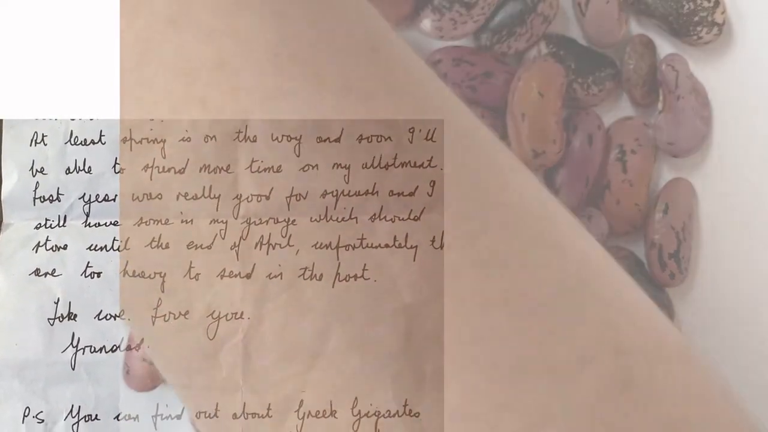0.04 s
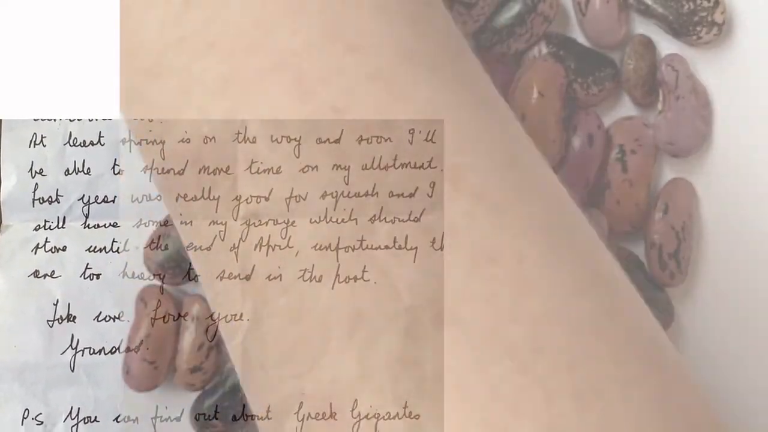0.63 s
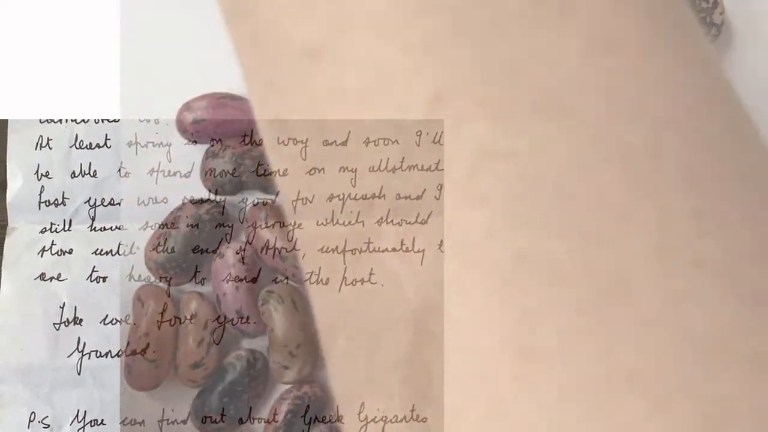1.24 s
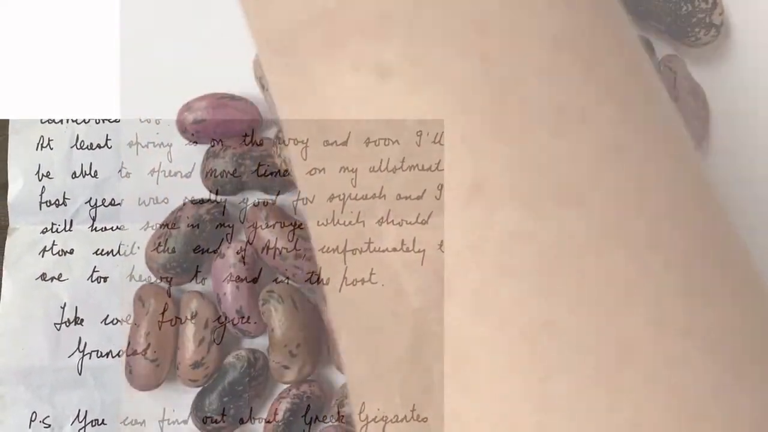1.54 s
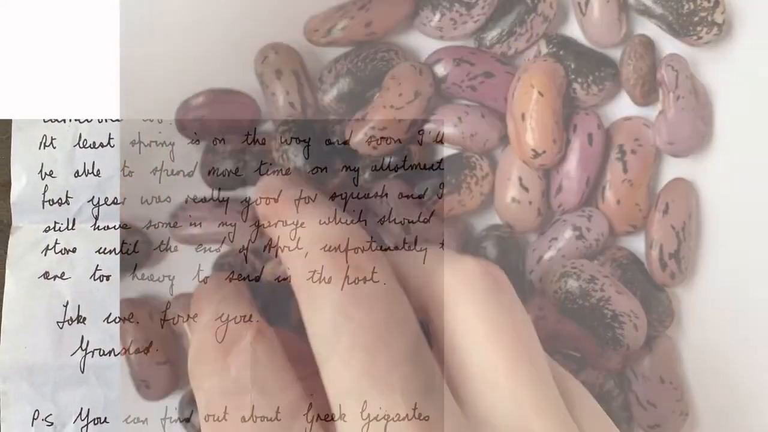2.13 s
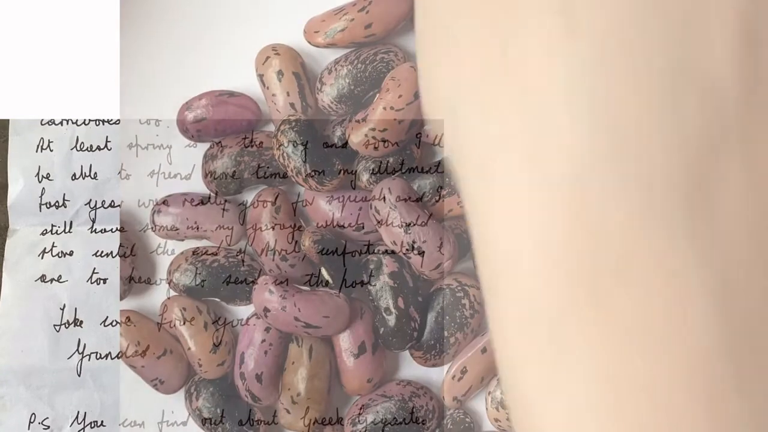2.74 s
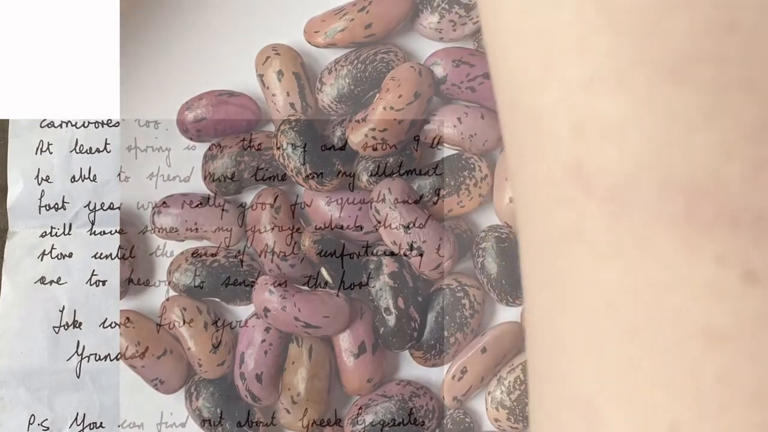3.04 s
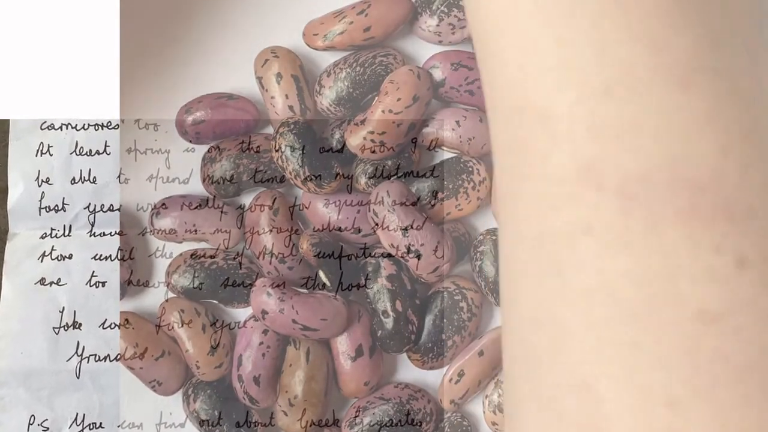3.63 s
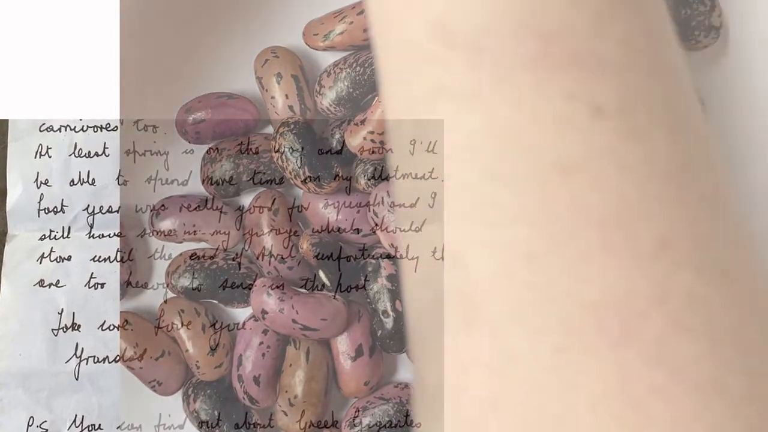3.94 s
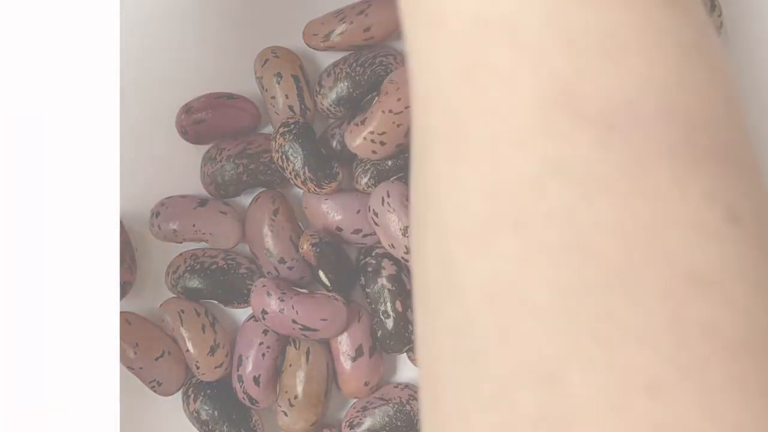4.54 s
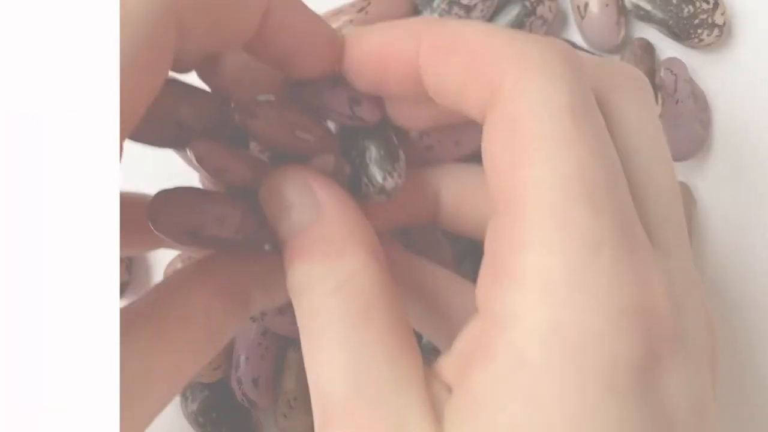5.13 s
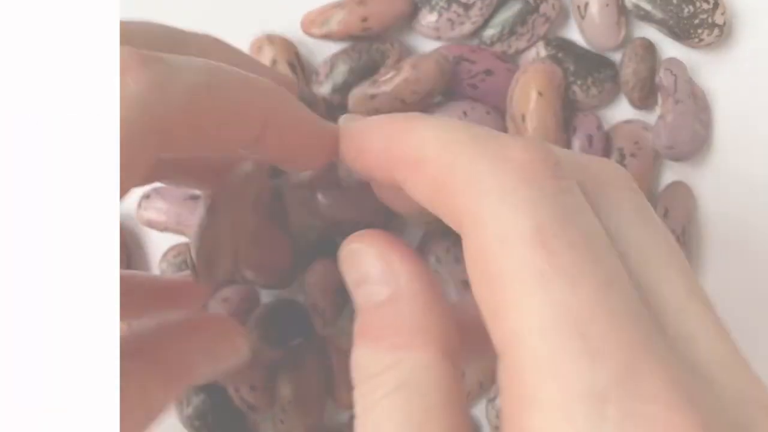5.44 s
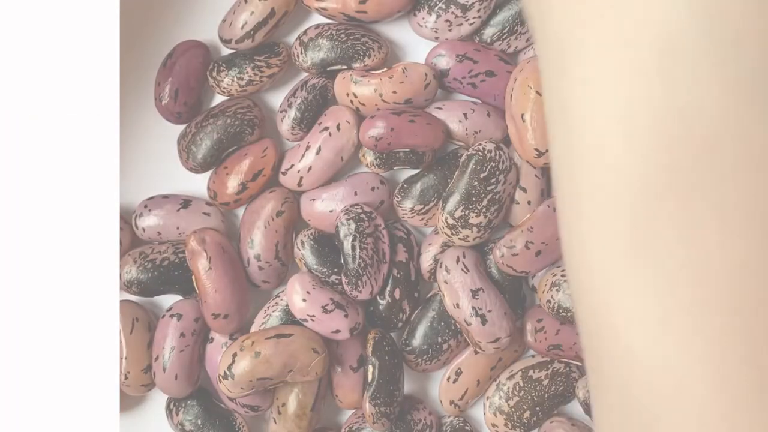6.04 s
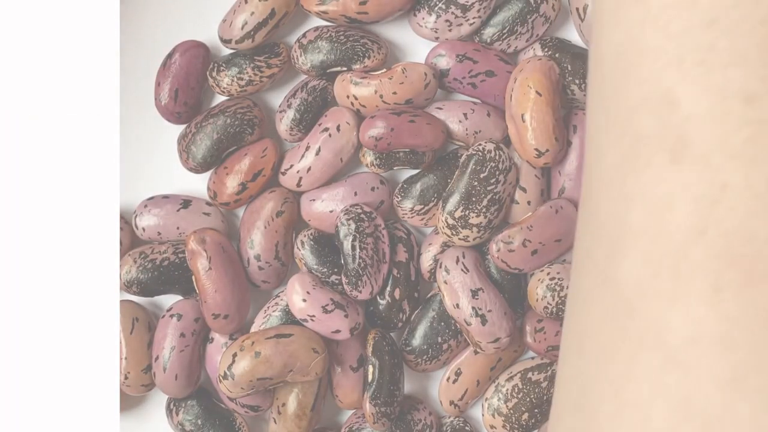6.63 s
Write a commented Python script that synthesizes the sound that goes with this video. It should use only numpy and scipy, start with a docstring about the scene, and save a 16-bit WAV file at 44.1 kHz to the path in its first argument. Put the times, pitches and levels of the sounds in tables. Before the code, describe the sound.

Large dried beans are stirred by hand on a paper-covered table, heard from close by in a small quiet room. From the start they scrape softly and click against one another. At about 0.9 seconds a few drop onto the table with hollow taps, and around 2 seconds a larger spill drums on the top and makes the paper crackle. From about 2.5 to 4.7 seconds the hands push through the pile in several firmer strokes, with dry rattling and sharp little clicks. After a brief lull, the loudest handful clatters down between 5.2 and 5.6 seconds. From about 6 seconds, lighter scraping and clicking continue until the end, near 7 seconds. A faint room hush and the low rumble of arms moving on the table lie underneath throughout.

```python
"""A small quiet room, one microphone close to a paper-covered table where hands stir large dried beans.
Pushed beans scrape and click against one another, ringing the hollow pile and the sheet under it.
Three times a handful tumbles down, drumming on the table top and making the paper crackle.
Underneath lie the hush of the room and the low rumble of arms moving on the table."""
import sys
import numpy as np
from scipy import signal
from scipy.fft import rfft, irfft
from scipy.io import wavfile

SR = 44100
rng = np.random.default_rng(int(sys.argv[2]) if len(sys.argv) > 2 else 0)


def file_out(sig):
    """Save sig as 16-bit WAV at sys.argv[1]."""
    # one column per channel
    cols = np.atleast_2d(sig).T
    # limit, then scale
    lim = np.clip(cols, -1, 1)
    pcm = np.round(lim * 32767).astype(np.int16)
    wavfile.write(sys.argv[1], SR, pcm)


N = 298998
TIME = np.arange(N) / SR

# spectrum of the room tone: frequency_hz, level_db
HUSH_SPECTRUM = [(60, -25), (130, -10), (220, -3), (300, 0), (370, -6), (470, -6), (600, -16), (850, -21),
                 (1500, -29), (3500, -27), (6000, -32), (10000, -36), (16000, -54)]
# spectrum of the rumble in the table: frequency_hz, level_db
RUMBLE_SPECTRUM = [(8, -6), (16, 8), (25, -1), (50, 0.5), (63, -2.5), (80, -15.5), (100, -10), (125, -8.5),
                   (165, -18), (200, -20), (320, -44)]
# fingers lingering in the pile: start_s, length_s, level_db
TOUCHES = [(0, 0.5, -66), (.55, 0.66, -72.5), (1.49, 0.038, -75.5), (2.8, 0.29, -73), (3.6, 0.23, -79.5),
           (4.55, 0.22, -76.5), (4.75, 0.077, -84), (6.06, 0.081, -64.5)]
# pushes through the pile: start_s, length_s, scrape_db, edge_db
PUSHES = [(0.14, 0.24, -59.5, -66), (0.615, 0.19, -62, -74), (1.05, 0.14, -70.5, -70),
          (1.19, 0.048, -59, -57.5), (1.39, 0.043, -66.5, -77), (2.414, 0.024, -55, -83),
          (2.505, 0.24, -49.5, -50), (2.7, 0.14, -63, -66), (3.115, 0.34, -50.5, -48.5),
          (3.735, 0.12, -52.5, -66), (3.86, 0.23, -50.5, -45), (4.13, 0.082, -51.5, -48),
          (4.25, 0.094, -52.5, -45.5), (4.37, 0.093, -60, -50), (4.465, 0.071, -54.5, -48),
          (4.64, 0.027, -60, -85), (6.15, .15, -53.5, -77), (6.31, 0.23, -62, -63.5),
          (6.48, 0.51, -62.5, -62.5), (6.67, 0.25, -60, -64)]
# spectrum of sliding beans: frequency_hz, level_db
SCRAPE_SPECTRUM = [(100, -14), (200, -6), (320, -4), (550, -6), (950, -4), (1400, -1), (2200, -3.5),
                   (3200, -6), (5000, -16), (9000, -26.5)]
# spectrum of the scrape's bright edge: frequency_hz, level_db
EDGE_SPECTRUM = [(1500, -51.5), (2800, -5), (4200, 1.5), (6000, -5), (8000, -10.5), (9200, -17.5),
                 (10300, -9), (12000, -13), (16000, -30.5)]
# resonances of the pile lying on the paper: pitch_hz, width_hz, gain_db
PILE_MODES = [(164, 93, 11.5), (320, 55, 6.5), (415, 110, -0.5), (799, 98, -1), (908, 67, -11),
              (1015, 39, 3), (1550, 180, -6.5), (2830, 71, -10.5)]
# one bean knocking another: start_s, level_db, pitch_hz, width_octaves
CLICKS = [(0.136, -48.5, 3320, .45), (0.151, -48, 3080, 1.1), (0.2056, -44.5, 1450, 0.96),
          (0.26, -45.5, 3500, 0.55), (0.3407, -43, 3660, 0.7), (0.3847, -49, 2130, 0.57),
          (0.458, -50.5, 1360, 0.98), (0.6169, -39.5, 1560, .86), (0.6581, -41.5, 1690, 0.45),
          (0.675, -45, 2270, .48), (0.6964, -35.5, 2260, 0.55), (0.7266, -29, 3700, 0.54),
          (0.7402, -41, 1900, 0.54), (0.754, -41, 1820, 0.32), (0.7788, -44, 1790, 0.5),
          (0.895, -40, 4200, 0.56), (0.9726, -47.5, 2720, 0.5), (1.0784, -43, 2830, 0.57),
          (1.2139, -39.5, 3780, 0.59), (1.229, -41.5, 1740, 0.69), (1.3182, -45, 1880, 0.15),
          (1.558, -43, 1850, .31), (1.932, -42.5, 4600, 0.84), (1.952, -43, 3020, 0.36),
          (1.991, -45, 4290, 0.78), (2.05, -44, 7140, 0.68), (2.4225, -43, 2920, 0.44),
          (2.545, -46, 3000, .65), (2.614, -36.5, 2130, 0.61), (2.6636, -38, 4700, 0.38),
          (2.6873, -38.5, 2820, 0.59), (2.721, -37, 3730, 0.36), (2.75, -37, 3200, 0.91),
          (2.7586, -33, 3200, 0.53), (2.8692, -50.5, 1480, 0.74), (3.131, -33.5, 3530, 0.37),
          (3.1794, -40.5, 4200, 0.37), (3.284, -45, 3270, 0.37), (3.3123, -29.5, 3680, 0.42),
          (3.3558, -38.5, 2250, 0.47), (3.385, -31.5, 4040, 0.45), (3.8187, -38.5, 1970, 0.76),
          (3.8927, -40.5, 3340, 1.1), (3.919, -43, 3620, 1.1), (3.996, -35.5, 3800, 0.43),
          (4.0194, -30, 2700, 0.83), (4.0385, -22.5, 4200, 0.44), (4.1132, -37, 2150, 0.55),
          (4.1669, -40.5, 4180, .46), (4.1895, -36, 4000, 0.37), (4.2001, -35, 3200, 0.4),
          (4.3064, -35.5, 2600, 0.43), (4.3176, -35.5, 2840, .42), (4.3686, -38, 3060, .35),
          (4.3873, -46, 2460, 0.31), (4.471, -34.5, 3730, 0.38), (4.487, -39.5, 3020, 0.27),
          (4.529, -42, 2960, 0.4), (4.6024, -49, 3270, 0.4), (4.6439, -44.5, 2440, 0.49),
          (5.028, -63, 7640, 1), (5.087, -59, 6730, 1.1), (5.128, -47, 9350, 0.84),
          (5.1713, -45.5, 6100, 0.51), (5.2281, -45.5, 4430, 0.84), (5.2714, -30, 5740, 0.59),
          (5.3007, -30, 5830, 0.45), (5.393, -29.5, 4560, 0.26), (5.4078, -32, 5270, 0.43),
          (5.4921, -52, 4650, .6), (5.5336, -37, 3980, 0.3), (5.5768, -37.5, 4080, 0.24),
          (6.0579, -38, 1013, 0.58), (6.114, -25, 5170, 0.26), (6.169, -40.5, 1800, 0.51),
          (6.195, -43, 2410, 0.63), (6.2195, -40.5, 1680, 0.57), (6.303, -41.5, 2770, 0.37),
          (6.363, -41.5, 5940, 0.63), (6.3723, -41.5, 1100, 0.43), (6.4201, -40.5, 2880, 0.46),
          (6.564, -45, 2530, 0.43), (6.6772, -44.5, 2020, 0.81), (6.747, -37.5, 2230, 0.46)]
# one bean landing on the table: start_s, level_db
LANDINGS = [(0.895, -22), (0.902, -29), (0.938, -26), (0.971, -29), (1.013, -34.5), (1.932, -28),
            (1.95, -23), (1.981, -27.5), (2.015, -27), (2.05, -45), (2.063, -21), (2.129, -22.5),
            (2.144, -32), (2.159, -23.5), (2.242, -42), (2.271, -38.5), (5.165, -23.5), (5.199, -29.5),
            (5.244, -19), (5.265, -18), (5.283, -17.5), (5.299, -17.5), (5.346, -24), (5.375, -30),
            (5.405, -23.5), (5.418, -19), (5.496, -30), (5.532, -25.5)]
# modes of the table top: pitch_hz, level_db, t60_s
TABLE_MODES = [(378, -5, 0.067), (441, -3.5, 0.058), (459.6, 5.5, 0.088), (557, 7.5, 0.12),
               (604.7, 3.5, 0.11), (674, 9, 0.058), (752, -1, 0.036), (806, -5.5, 0.083), (900, -39, .04)]
# beans spilling from the hand: start_s, length_s, drum_db, crackle_db
TUMBLES = [(0.897, 0.19, -51, -61), (1.932, 0.21, -43, -56), (5.163, 0.036, -39, -53.5),
           (5.262, 0.13, -29.5, -42.5), (5.47, 0.05, -40.5, -57)]
# spectrum of the crackling paper: frequency_hz, level_db
CRACKLE_SPECTRUM = [(200, -23), (600, -5), (1200, -8), (2200, -9), (4000, -1), (6500, -13), (9000, -10),
                    (10200, -9), (12000, -19), (16000, -16)]
# decay of the room: frequency_hz, t60_s
ROOM_DECAY = [(200, 0.63), (1000, 0.11), (4000, 0.19), (14000, 0.23)]

# a push swells to its middle and the beans run on after it; the bright edge swells more, stops sooner
SCRAPE_SHAPE = dict(attack_s=0.0033, swell_db=4, fall_db_per_s=188)
EDGE_SHAPE = dict(attack_s=0.0033, swell_db=9, fall_db_per_s=237.5)
# a tumble sets in at once, then dies away as the beans come to rest
DRUM_SHAPE = dict(attack_s=0.0017, swell_db=1.5, fall_db_per_s=157)
CRACKLE_SHAPE = dict(attack_s=0.0017, swell_db=1.5, fall_db_per_s=149)
# a knock's scuff ahead of the contact, and the opening stretch that sets its level
LEAD_SAMPLES, ATTACK_SAMPLES = 130, 350


def amp(db):
    """Decibels to gain."""
    return 10 ** (np.asarray(db) / 20)


def unit(x):
    """Scales to an rms of 1."""
    return x / np.sqrt(np.mean(x ** 2) + 1e-20)


def value_at(points, hz):
    """Reads a table over frequency, joined on a log axis."""
    table_hz, value = np.transpose(points)
    return np.interp(np.log(hz + 1), np.log(table_hz + 1), value)


def add(mix, start_s, sound):
    """Mixes a sound in at a time."""
    part = mix[max(round(start_s * SR), 0):][:len(sound)]
    part += sound[:len(part)]


def convolve(x, response):
    """Convolution cut to the length of x."""
    return signal.oaconvolve(x, response)[:len(x)]


def pulse(level_db, size=2048):
    """The causal pulse whose spectrum is the function level_db(hz)."""
    hz = abs(np.fft.fftfreq(size, 1 / SR))
    log_gain = np.log(amp(np.maximum(level_db(hz), -90)))
    minimum_phase = np.exp(np.conj(signal.hilbert(log_gain)))
    return np.fft.ifft(minimum_phase).real[:size // 2]


def colour(x, spectrum):
    """Gives x a spectrum without blurring its attacks; rms 1."""
    return unit(convolve(x, pulse(lambda hz: value_at(spectrum, hz))))


def noise(spectrum):
    """Steady noise of a given spectrum; rms 1."""
    gain = amp(value_at(spectrum, np.fft.rfftfreq(N, 1 / SR)))
    return unit(irfft(rfft(rng.standard_normal(N)) * gain, N))


def drift(span_s):
    """A random curve of rms 1 that turns about once a span."""
    knots = rng.standard_normal(4000)
    return unit(np.interp(TIME / span_s, np.arange(len(knots)), knots))


def grains(per_s, spread_db, count=9000):
    """Random tiny impulses, most faint and a few strong."""
    gaps, strength = rng.exponential(1, (2, count))
    height = amp(spread_db * np.minimum(strength, 3)) * rng.choice([-1, 1], count)
    at = (np.cumsum(gaps) * SR / per_s).astype(int)
    return np.bincount(at[at < N], height[at < N], N)


def strokes(rows, db_column, attack_s, swell_db, fall_db_per_s):
    """Gain over time of hand movements: a quick attack, an arched hold, a steady fall."""
    gain = np.zeros(N)
    for row in rows:
        start_s, length_s = row[:2]
        t = np.arange(0, length_s + 1, 1 / SR)
        sag = (2 * np.minimum(t / length_s, 1) - 1) ** 2
        level_db = row[db_column] - swell_db * sag - fall_db_per_s * np.maximum(t - length_s, 0)
        add(gain, start_s, np.minimum(t / attack_s, 1) * amp(level_db))
    return gain


def room_tone(level_db=-69):
    """The steady hush of the room."""
    return amp(level_db) * noise(HUSH_SPECTRUM)


def table_rumble(steady_db=-59.5, push_db=-2.5, thud_db=-23, thud_s=0.049, uneven_db=2):
    """Arms rumble on the table, more with each push; each landing adds a low shudder."""
    rumble = unit(noise(RUMBLE_SPECTRUM) * amp(uneven_db * drift(0.043)))
    pushed = amp(push_db) * strokes(PUSHES, db_column=2, **SCRAPE_SHAPE)
    thud_power, t = np.zeros(N), np.arange(SR // 2) / SR
    for start_s, level_db in LANDINGS:
        add(thud_power, start_s, (amp(level_db + thud_db) * np.exp(-t / thud_s)) ** 2)
    return rumble * np.sqrt(amp(steady_db) ** 2 + pushed ** 2 + thud_power)


def knock(pitch_hz, octaves, jostle_db, jostle_s, skirt_db, scuff_db=-15, scuff_s=0.00098, size=1400):
    """The skins scuff, meet in one hard contact, and the neighbours chatter for a few milliseconds."""
    def band_db(hz):
        bell = np.exp(-(np.log2((hz + 1) / pitch_hz) / max(octaves, .2) / 2) ** 2)
        skirt = amp(skirt_db) * hz / (hz + 250) / (1 + (hz / 8000) ** 2)
        return 20 * np.log10(bell + skirt)
    t = (np.arange(size) - LEAD_SAMPLES) / SR
    grit = rng.standard_normal(size)
    chatter = grit * (t > 0) * np.exp(-abs(t) / jostle_s)
    chatter *= amp(jostle_db) / np.linalg.norm(chatter)
    scuff = grit * (t < 0) * np.exp(-abs(t) / scuff_s)
    scuff *= amp(scuff_db) / np.linalg.norm(scuff)
    return convolve(scuff + (t == 0) + chatter, pulse(band_db))


def rattle(per_s, spread_db, hiss_db, slip_db, drift_db, bands=36):
    """Many small contacts, different pitches taking turns, over sharp slips and a smooth hiss."""
    contacts = np.zeros(N)
    for pitch_hz in np.geomspace(500, 15000, bands):
        contact = knock(pitch_hz, octaves=.33, jostle_db=-4, jostle_s=.0012, skirt_db=-32)
        hits = grains(per_s / bands, spread_db) * amp(drift_db * drift(0.024))
        contacts += convolve(hits, unit(contact) * np.sqrt(pitch_hz))
    slips = unit(grains(per_s / 3, spread_db))
    return unit(contacts) + amp(slip_db) * slips + amp(hiss_db) * rng.standard_normal(N)


def stirring(touch_edge_db=-3.5, hollow_hz=960, hollow_db=-1):
    """Fingers slide beans over one another and over the paper: a scrape, its edge and light clicks."""
    touch = strokes(TOUCHES, db_column=2, **SCRAPE_SHAPE)
    effort = np.hypot(touch, strokes(PUSHES, db_column=2, **SCRAPE_SHAPE))
    bite = np.hypot(amp(touch_edge_db) * touch, strokes(PUSHES, db_column=3, **EDGE_SHAPE))
    settle = settling()
    dense = rattle(per_s=3000, spread_db=7, hiss_db=-4.5, slip_db=-4, drift_db=6)
    sparse = rattle(per_s=450, spread_db=7, hiss_db=-12, slip_db=-10.5, drift_db=4)
    scrape = colour(dense, SCRAPE_SPECTRUM) * np.hypot(effort, settle)
    edge = colour(sparse, EDGE_SPECTRUM) * np.hypot(bite, settle)
    # beans dragged along the sheet give the scrape a hollow note
    hollow = signal.lfilter(*signal.iirpeak(hollow_hz, Q=5, fs=SR), scrape)
    return scrape + amp(hollow_db) * hollow + edge + light_clicks(effort)


def light_clicks(effort, per_s=40, gain_db=-5, bands=6):
    """Light knocks come at random while the pile moves, as strong as the push behind them."""
    out = np.zeros(N)
    for pitch_hz in np.geomspace(1300, 6000, bands):
        click = knock(pitch_hz, octaves=0.51, jostle_db=0.5, jostle_s=0.0024, skirt_db=-16, scuff_db=-10)
        hits = effort * grains(per_s / bands, spread_db=2.3)
        out += convolve(hits, click / np.std(click[:ATTACK_SAMPLES]))
    return amp(gain_db) * out


def pile_ring(contacts):
    """Contacts between beans also ring the hollow pile and the sheet under it."""
    ring = np.zeros(N)
    for pitch_hz, width_hz, gain_db in PILE_MODES:
        resonator = signal.iirpeak(pitch_hz, pitch_hz / width_hz, SR)
        ring += amp(gain_db) * signal.lfilter(*resonator, contacts)
    return contacts + ring


def bean_clicks(gain_db=-3):
    """The distinct knocks of bean on bean; light ones graze more, heavy ones strike cleanly."""
    out = np.zeros(N)
    for start_s, level_db, pitch_hz, octaves in CLICKS:
        lightness_db = -40 - level_db
        click = knock(pitch_hz, octaves, jostle_db=1 + 0.12 * lightness_db, jostle_s=0.0018,
                      skirt_db=-20, scuff_db=-20.5 + 0.3 * lightness_db)
        click /= np.std(click[:ATTACK_SAMPLES])
        add(out, start_s - LEAD_SAMPLES / SR, amp(level_db + gain_db) * click)
    return out


def settling(gain_db=-19, decay_s=0.015):
    """Gain over time of the rustle that each distinct knock leaves among its neighbours."""
    gain, t = np.zeros(N), np.arange(SR // 4) / SR
    for start_s, level_db, _, _ in CLICKS:
        add(gain, start_s, amp(level_db + gain_db) * np.exp(-t / decay_s))
    return gain


def table_ring(uneven_db=3, detune=0.05, size=6000):
    """The table's modes; every landing spot excites them in a different blend."""
    t = np.arange(size) / SR
    pitch_hz, level_db, t60_s = np.transpose(TABLE_MODES)[:, :, None]
    blend, shift = rng.standard_normal((2, len(TABLE_MODES), 1))
    decay = amp(level_db + uneven_db * blend - 60 * t / t60_s)
    ring = (decay * np.sin(2 * np.pi * pitch_hz * (1 + detune * shift) * t)).sum(0)
    return ring / abs(ring).max()


def tumbling(snap_db=-14, patter_db=-4):
    """Falling beans drum on the table, and the paper snaps and crackles under them."""
    landings, snaps = np.zeros(N), np.zeros(N)
    for start_s, level_db in LANDINGS:
        add(landings, start_s, amp(level_db) * table_ring())
        snap = knock(pitch_hz=4200, octaves=0.62, jostle_db=2.5, jostle_s=0.0036, skirt_db=-35)
        add(snaps, start_s - .002, amp(level_db + snap_db) * snap / abs(snap).max())
    # between the heavy landings, many light beans keep the table ringing
    patter = unit(sum(convolve(grains(per_s=50, spread_db=1.5), table_ring()) for _ in range(8)))
    patter *= amp(patter_db) * strokes(TUMBLES, db_column=2, **DRUM_SHAPE)
    # the table top radiates little below its lowest mode
    low_cut = signal.butter(7, 320, "high", fs=SR, output="sos")
    drumming = signal.sosfilt(low_cut, landings + patter)
    paper = rattle(per_s=740, spread_db=6, hiss_db=-2, slip_db=-13.5, drift_db=1)
    crackle = colour(paper, CRACKLE_SPECTRUM) * strokes(TUMBLES, db_column=3, **CRACKLE_SHAPE)
    return drumming + snaps + crackle


def room(direct, near_db=-9, near_s=0.007, tail_db=-14, dull_hz=7500, size=16000):
    """Quick reflections from the arms and table top, then the short tail of the room; both lose treble."""
    t = np.arange(size) / SR
    near = rng.standard_normal(size) * (rng.random(size) < .1)
    near *= (t > .002) * np.exp(-t / near_s)
    hz, frame_s, bands = signal.stft(rng.standard_normal(size) * (t > .008), SR, nperseg=256)
    decay = amp(-60 * frame_s / value_at(ROOM_DECAY, hz)[:, None])
    tail = signal.istft(bands * decay, SR, nperseg=256)[1][:size]
    echoes = amp(near_db) * near / np.linalg.norm(near) + amp(tail_db) * tail / np.linalg.norm(tail)
    return direct + convolve(direct, signal.lfilter(*signal.butter(2, dull_hz, fs=SR), echoes))


def scene():
    """Beans, paper and table from close by, with the room behind them; mono."""
    beans = pile_ring(bean_clicks() + stirring()) + tumbling()
    return (room(beans) + table_rumble() + room_tone())[None]


def record(dry):
    """The recorder passes the microphone's signal up to 16 kHz."""
    band_limit = signal.firwin(401, 16000, window=("kaiser", 8), fs=SR)
    return signal.oaconvolve(dry, band_limit[None], "same")


dry = scene()
out = record(dry)
file_out(out)
```